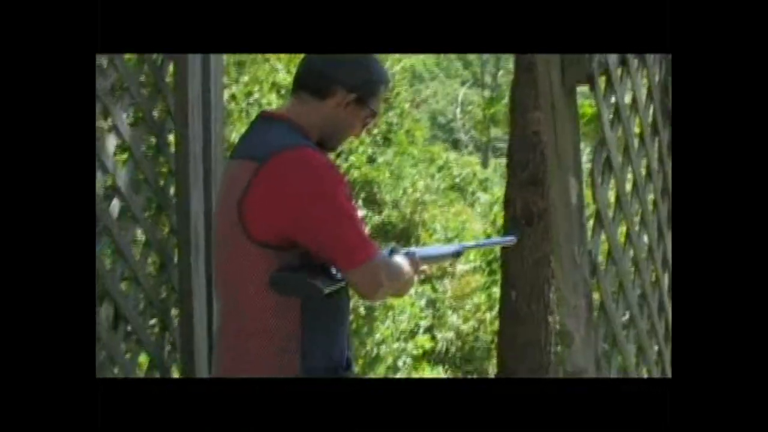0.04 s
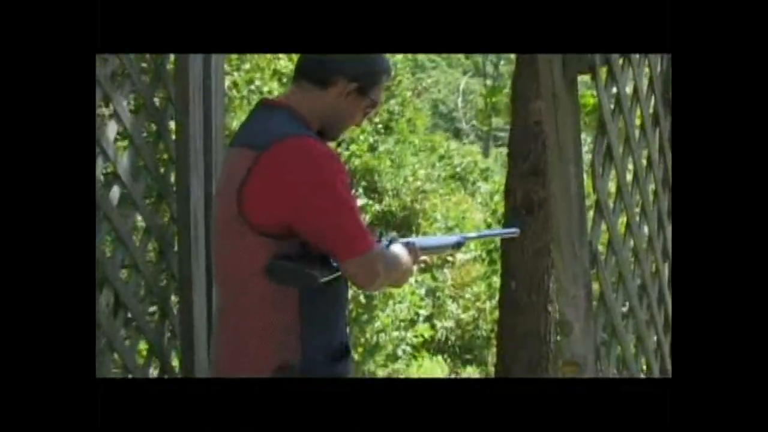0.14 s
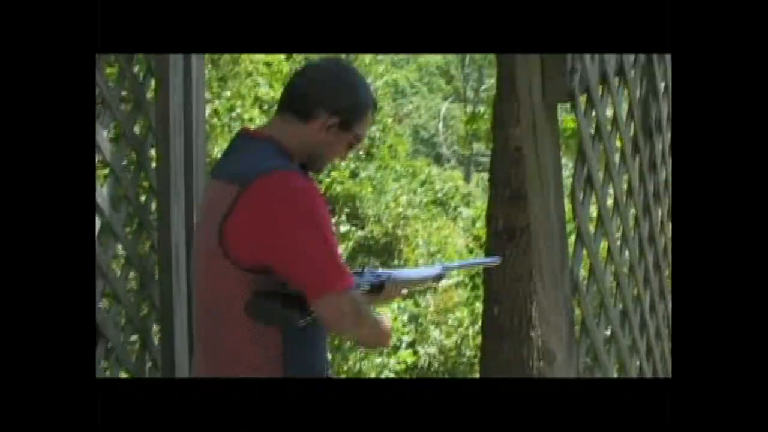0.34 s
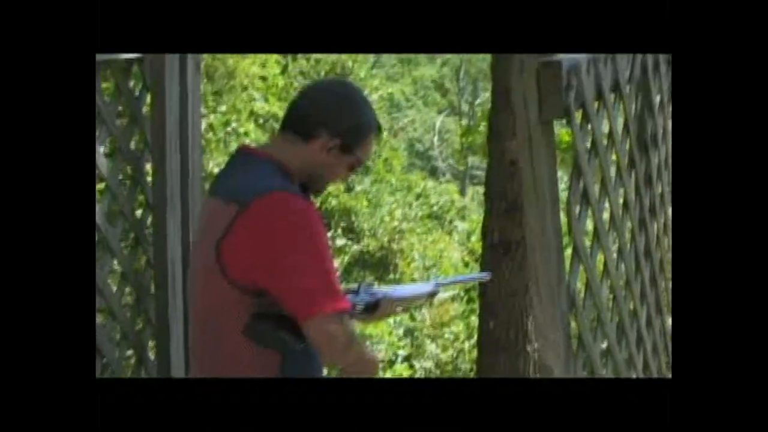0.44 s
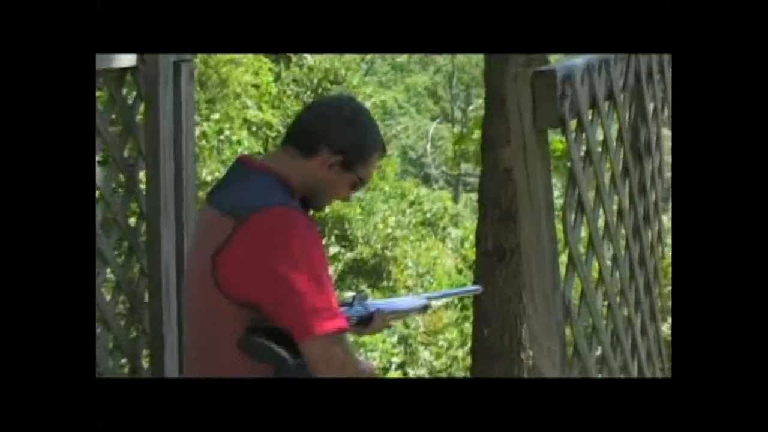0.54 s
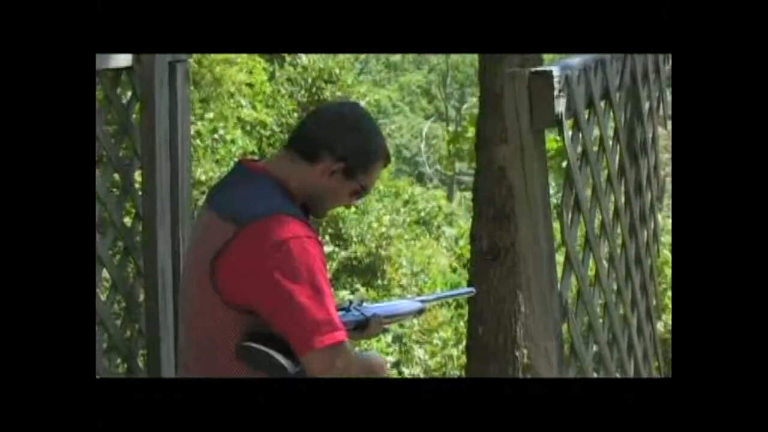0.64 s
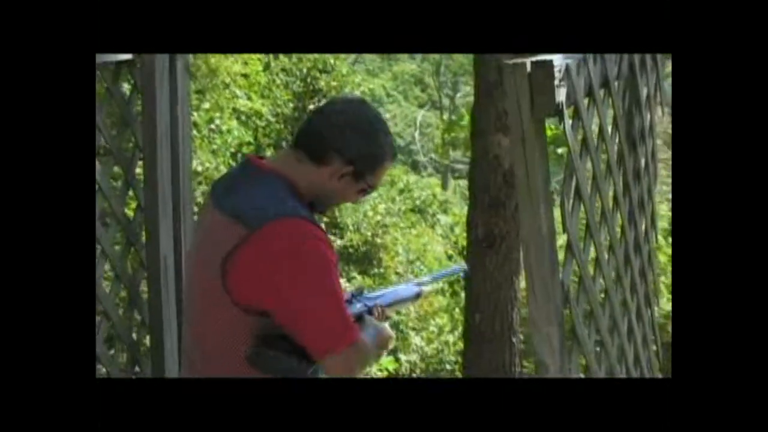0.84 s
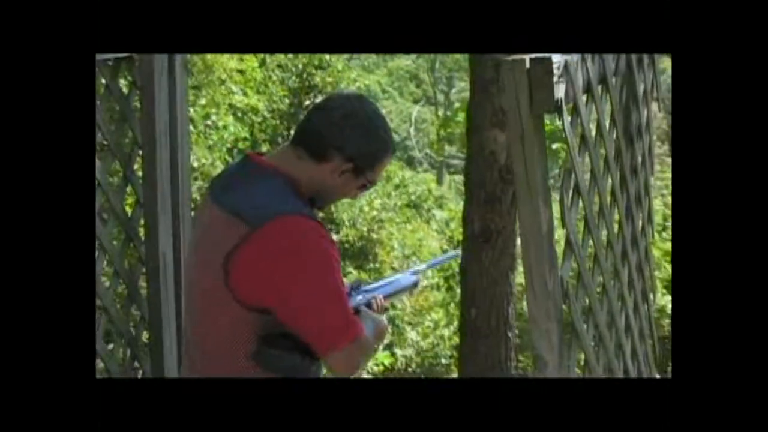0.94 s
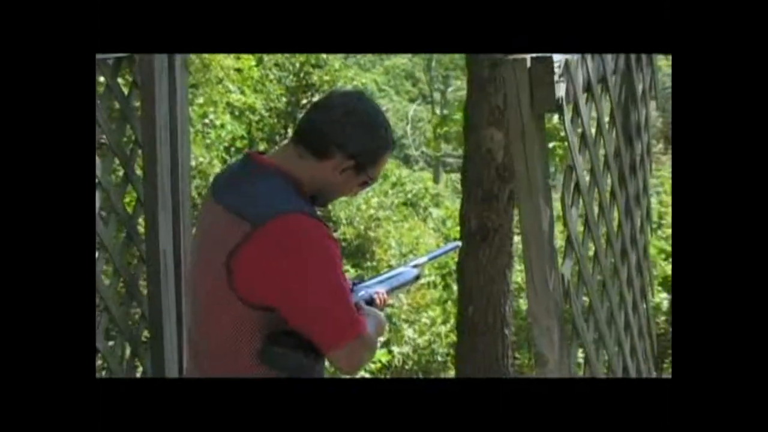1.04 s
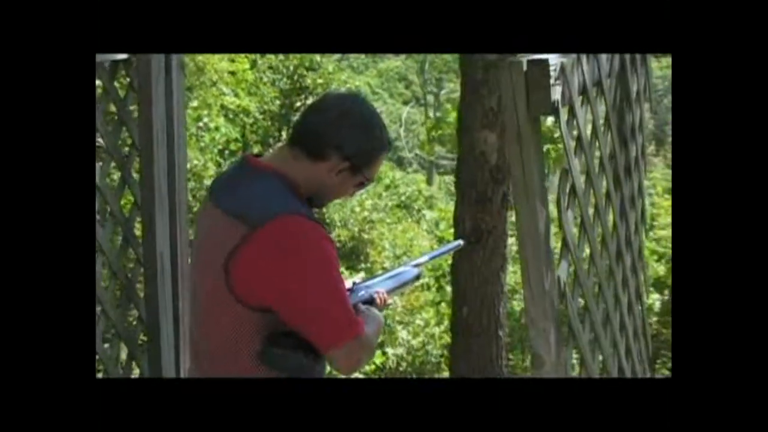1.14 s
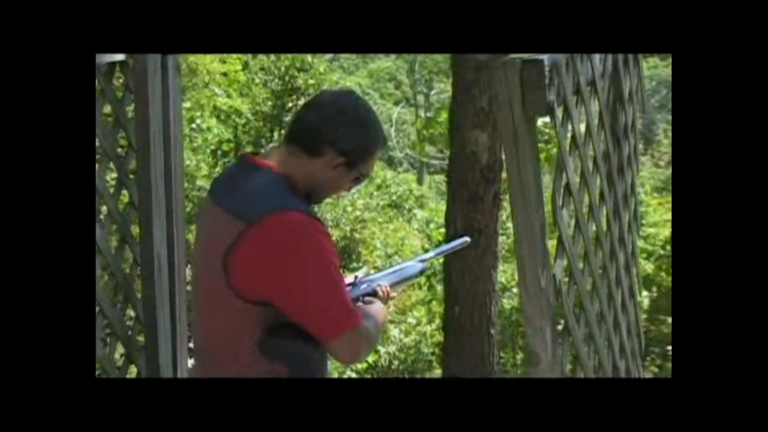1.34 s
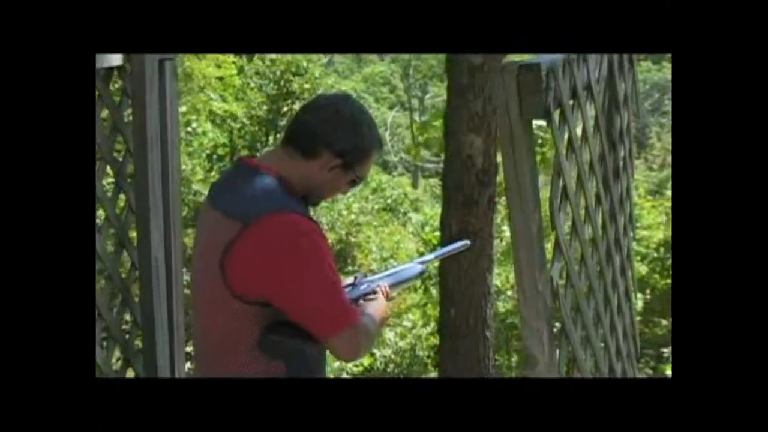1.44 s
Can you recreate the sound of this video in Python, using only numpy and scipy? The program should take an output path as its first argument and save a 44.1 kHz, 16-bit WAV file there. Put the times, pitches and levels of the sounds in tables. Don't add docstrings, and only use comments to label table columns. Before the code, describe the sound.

Loud steel clack of a shotgun action closing outdoors, followed by light clicks of shells loading

```python
import sys
import numpy as np
from scipy import signal
from scipy.fft import rfft, irfft
from scipy.io import wavfile
from scipy.ndimage import uniform_filter1d

SR = 44100
rng = np.random.default_rng(int(sys.argv[2]) if len(sys.argv) > 2 else 0)


def wrap_up_sound(samples):
    columns = np.atleast_2d(samples).T
    tamed = np.clip(columns, -1, 1)
    steps = np.round(tamed * 32767).astype(np.int16)
    wavfile.write(sys.argv[1], SR, steps)


def undo_db(level):
    steps = np.asarray(level, float) / 20
    return 10 ** steps


N = 63945

# start_s, snap_db, snap_hz, knock_db, fizz_db
ACTION_BLOWS = [(.2400, -22, 1500, -34, -28), (.2409, -7, 2950, -28, -24), (.2443, -18, 7000, -26, -20),
                (.2503, -15, 2500, -22, -20), (.2527, -11, 3000, -18, -18), (.2580, -13, 5500, -22, -16),
                (.2652, -13, 6200, -24, -17), (.2730, -13, 3500, -18, -18), (.2745, -14, 7200, -26, -18),
                (.2790, -16, 5500, -22, -18), (.2812, -12, 12000, -16, -12), (.2828, -9, 2000, -7, -14),
                (.2855, -16, 6000, -20, -15), (.3022, -12, 6000, -11, -13), (.3040, -12, 2500, -5, -18),
                (.3126, -9, 8300, -14, -10), (.3190, -5, 2200, -10, -10), (.3228, -5, 1900, -10, -12),
                (.3258, -5, 2200, -12, -14), (.3305, -17, 2600, -26, -25)]
# pitch_hz, level_db, t60_s
ACTION_KNOCK = [(735, 1.5, 0.012), (926, 9, 0.0073), (1410, -4, .02)]
# start_s, snap_db, snap_hz, knock_db, fizz_db
SHELL_TICKS = [(.0385, -47, 2540, -37.5, -58), (.0415, -32.5, 1184, -34.5, -67.5),
               (.9715, -45.5, 13970, -69, -64.5), (1.0597, -37.5, 2650, -36, -53),
               (1.0720, -65, 3000, -38, -51), (1.0780, -31.5, 3060, -31, -47.5),
               (1.1244, -41, 3000, -46, -55), (1.2182, -13, 3140, -26.5, -23),
               (1.2190, -19.5, 1900, -23.5, -24.5), (1.2215, -23.5, 6200, -27, -31.5),
               (1.2480, -35.5, 3400, -62, -49), (1.2608, -26, 3400, -44, -43),
               (1.2660, -32, 3250, -31, -32), (1.2690, -25, 1850, -33.5, -53.5),
               (1.2910, -35, 3430, -41.5, -47.5), (1.3787, -26.5, 3260, -38.5, -41.5),
               (1.4008, -27, 3230, -44, -52.5), (1.4310, -47.5, 3600, -45.5, -72),
               (1.4468, -27, 3450, -45, -43)]
# pitch_hz, level_db, t60_s
SHELL_KNOCK = [(799, 2, 0.03), (895, -13, 0.068), (1420, 2, 0.011), (464, -12.5, 0.0079)]
SLIDE_TIMES = (.2355, .2405, .255, .284, .299, .3115, .3135, .3275, .337)
SLIDE_LEVELS = [
    -58,
    -25,
    -16.5,
    -17,
    -24,
    -11,
    -6,
    -7,
    -43,
]
# pitch_hz, density_db (per Hz)
SCRAPE_COLOUR = [(150, -1), (400, 1.5), (850, 4.5), (2200, 2.5), (3200, 0.5), (4200, -8), (8000, -4.5),
                 (15500, -10)]
# pitch_hz, level_db, t60_s
BARREL_MODES = [(498, 0.5, 0.25), (1310, 3.5, 0.098), (1664, -7.5, 0.54), (2510, -23.5, 0.087),
                (4440, -30.5, .35), (4510, -21, 0.36), (4996, -22.5, 0.28), (7100, -20.5, .15),
                (9370, -14, .3)]
# pitch_hz, t60_s
TREE_DECAY = [(300, 0.51), (1500, 0.13), (5000, 0.37), (14000, 0.3)]
# pitch_hz, density_db (per Hz)
AIR_COLOUR = [(150, -2), (400, -5), (900, -6.5), (1660, -15), (3000, -21), (6000, -27.5), (11000, -32.5),
              (15500, -42.5)]
# time_s, level_db
WIND_SWELL = [
    (0.0, -46),
    (0.568, -46.5),
    (0.742, -45.5),
    (1.02, -51),
    (1.45, -53),
]
# pitch_hz, density_db (per Hz)
WIND_COLOUR = [(25, -32), (62, -1.5), (128, -6.5), (250, -19.5), (500, -34), (900, -55.5)]
# level_db, pitch_hz, length_s
MIC_PUFFS = [
    (-36, 53, 0.039),
    (-26, 60, 0.033),
    (-21.5, 109, 0.02),
    (-28.5, 150, 0.018),
    (-29.5, 142, 0.035),
    (-34, 223, .016),
    (-28.5, 542, 0.0052),
    (-36, 274, 0.011),
]
PUFF_STARTS = (.030, .240, .310, .706, .729, .924, 1.0582, 1.264)


def evened(x):
    return x / np.sqrt(np.mean(x ** 2) + 1e-20)


def read(points, hz):
    f, value = np.transpose(points)
    return np.interp(np.log(hz + 1), np.log(f + 1), value)


def curve(points, outside=None):
    s, value = np.transpose(points)
    return np.interp(np.arange(N) / SR, s, value, left=outside, right=outside)


def add(mix, s, sound):
    part = mix[round(s * SR):][:len(sound)]
    part += sound[:len(part)]


def coloured(x, shape):
    hz = np.fft.rfftfreq(len(x), 1 / SR)
    low_cut = np.minimum(hz / shape[0][0], 1) ** 2
    return irfft(rfft(x) * undo_db(read(shape, hz)) * low_cut, len(x))


def ring(modes, seconds, sag=0):
    t = np.arange(round(seconds * SR)) / SR
    bent = t if sag == 0 else np.log1p(2 * sag * t) / (2 * sag)
    return sum(undo_db(db - 60 * t / t60) * np.sin(2 * np.pi * hz * bent) for hz, db, t60 in modes)


def hits(rows, knock, sag, snap_t60, fizz_t60):
    out = np.zeros(N)
    t = np.arange(2600) / SR
    seconds = len(t) / SR
    fizz_band = signal.butter(1, [4500, 12300], "band", fs=SR)
    chatter_s, chatter_db = 0.0016, -6
    snap_attack = np.minimum(t / 0.00036, 1)
    knock_attack = np.minimum(t / 0.0012, 1)
    for s, snap_db, hz, knock_db, fizz_db in rows:
        noise = rng.standard_normal(len(t))
        detune = rng.uniform(-1.14, 1, 6)
        upper_hz = hz * (1.45 + 0.23 * detune[5])
        lower_hz = hz * (0.72 + 0.095 * detune[4])
        partials = [(hz, 0, snap_t60), (upper_hz, -9, snap_t60), (lower_hz, -7, snap_t60)]
        snap = ring(partials, seconds, sag)
        chatter = noise[::-1][:200] * np.exp(-t[:200] / chatter_s)
        chatter = chatter / np.linalg.norm(chatter) / 2
        snap = snap + undo_db(chatter_db) * np.convolve(snap, chatter)[:len(t)]
        fizz = signal.lfilter(*fizz_band, noise) * undo_db(-60 * t / fizz_t60)
        modes = [(f * (1 + 0.04 * d), db, t60) for (f, db, t60), d in zip(knock, detune)]
        body = ring(modes, seconds)
        bright = snap_attack * (undo_db(snap_db) * snap + undo_db(fizz_db) * fizz)
        add(out, s, bright - undo_db(knock_db) * knock_attack * body)
    return out


def action():
    return hits(ACTION_BLOWS, ACTION_KNOCK, sag=0, snap_t60=0.011, fizz_t60=0.018)


def slide():
    slips_per_s, spread_db = 9000, 2.5
    size = undo_db(spread_db * np.minimum(rng.exponential(1, N), 4))
    size = size * (rng.random(N) < slips_per_s / SR)
    slips = signal.lfilter([1], [1, -0.9], size) * rng.standard_normal(N)
    pressure_db = curve(list(zip(SLIDE_TIMES, SLIDE_LEVELS)), outside=-120)
    pressure = undo_db(uniform_filter1d(pressure_db, size=20))
    return pressure * evened(coloured(slips, SCRAPE_COLOUR))


def barrel():
    start_s, level_db, attack_s = 0.328, -30, 0.003
    out = np.zeros(N)
    sound = ring(BARREL_MODES, 0.8)
    attack = np.minimum(np.arange(len(sound)) / (attack_s * SR), 1)
    add(out, start_s, undo_db(level_db) * sound * attack)
    return out


def shells():
    return hits(SHELL_TICKS, SHELL_KNOCK, sag=60, snap_t60=0.008, fizz_t60=0.015)


def stand(x):
    tail_db, near_db, near_t60 = -24, -23, 0.054
    noise = rng.standard_normal((2, SR // 2))
    age = np.arange(SR // 2) / SR
    hz, t, z = signal.stft(noise[0], SR, nperseg=256)
    decay = undo_db(-60 * t / read(TREE_DECAY, hz)[:, None])
    tail = signal.istft(z * decay, SR, nperseg=256)[1][:SR // 2]
    tail *= np.clip(age / 0.0067, 0, 1)
    near = noise[1] * undo_db(-60 * age / near_t60) * (age > 0.001)
    tail = undo_db(tail_db) * tail / np.linalg.norm(tail)
    near = undo_db(near_db) * near / np.linalg.norm(near)
    return signal.fftconvolve(x, tail + near)[:N]


def puffs():
    thump_loss = 0.8
    out = np.zeros(N)
    for s, (db, hz, length) in zip(PUFF_STARTS, MIC_PUFFS):
        t = np.arange(0, length, 1 / SR)
        bump = np.sin(np.pi * t / length) ** 1.8
        phase = 2 * np.pi * hz * t
        puff = bump * np.sin(phase + 0.67 * np.sin(phase))
        thump = bump * puff.sum() / bump.sum()
        add(out, s, undo_db(db) * (puff - thump_loss * thump))
    return out


def wind():
    air_db, air_follows, lump_db = -49.5, 0.26, 2
    swell_db = curve(WIND_SWELL)
    air_level = undo_db(air_db + air_follows * (swell_db - swell_db.mean()))
    air = air_level * evened(coloured(rng.standard_normal(N), AIR_COLOUR))
    lumps = uniform_filter1d(rng.standard_normal(N), size=900)
    lumps = evened(uniform_filter1d(lumps, size=900))
    low = coloured(rng.standard_normal(N), WIND_COLOUR)
    return air + undo_db(swell_db) * evened(low * undo_db(lump_db * lumps))


def scene():
    gun = action() + slide() + shells()
    mix = gun + stand(gun) + barrel() + wind() + puffs()
    return mix[None]


def band_limit(x):
    return signal.sosfilt(signal.butter(12, 15800, fs=SR, output="sos"), x)


def record(dry):
    held = np.clip(dry, -1, 1)
    low_pass = signal.firwin(767, 15900, window=("kaiser", 7), fs=SR)
    cut = signal.oaconvolve(held, low_pass[None], "same")
    return band_limit(cut)


dry = scene()
out = record(dry)
wrap_up_sound(out)
```